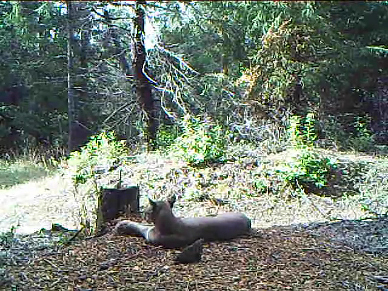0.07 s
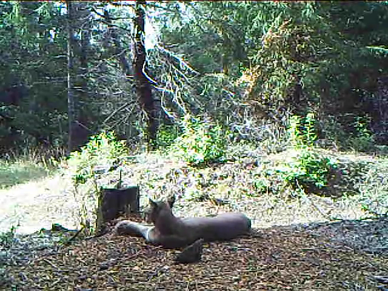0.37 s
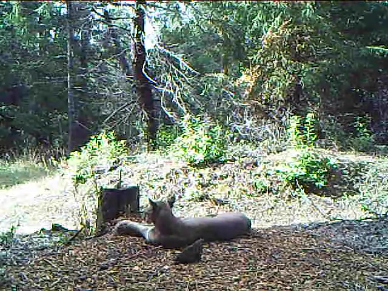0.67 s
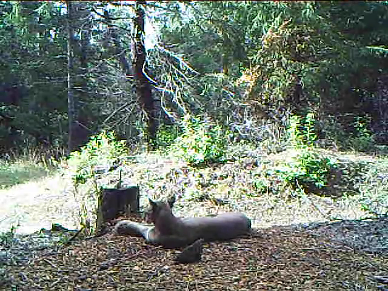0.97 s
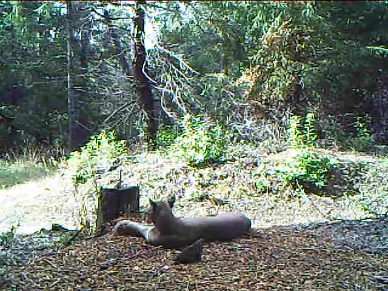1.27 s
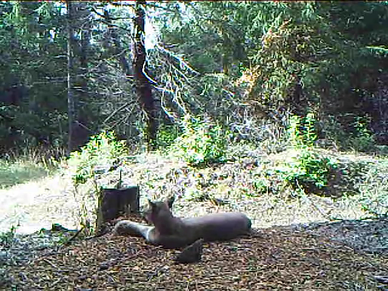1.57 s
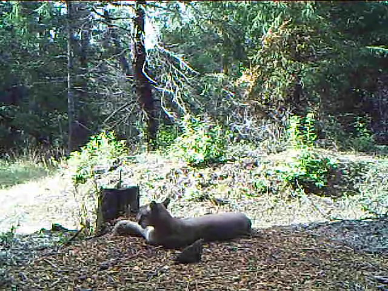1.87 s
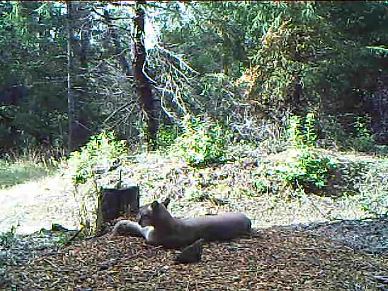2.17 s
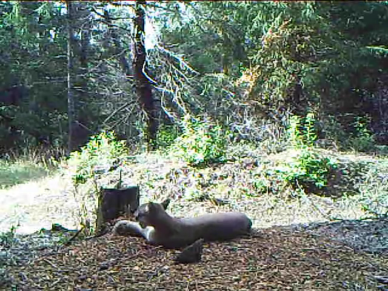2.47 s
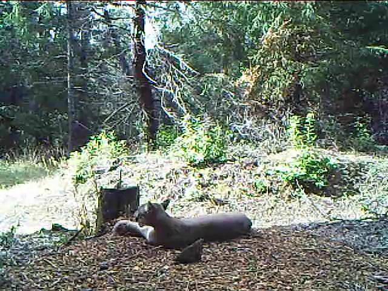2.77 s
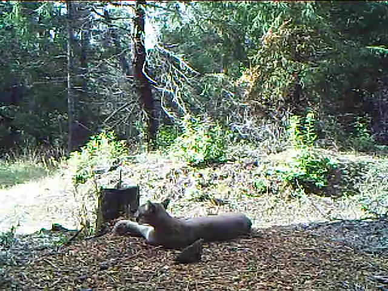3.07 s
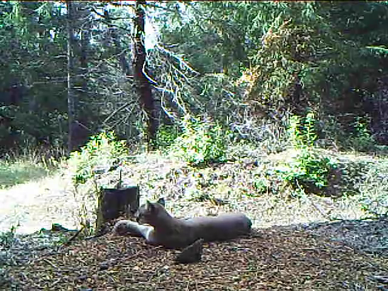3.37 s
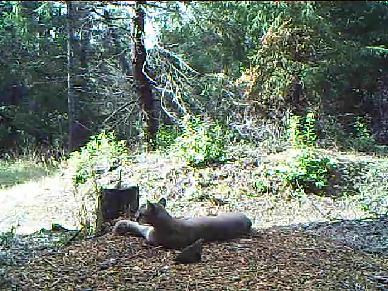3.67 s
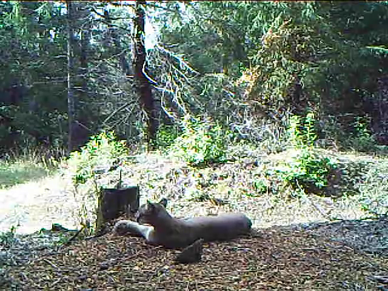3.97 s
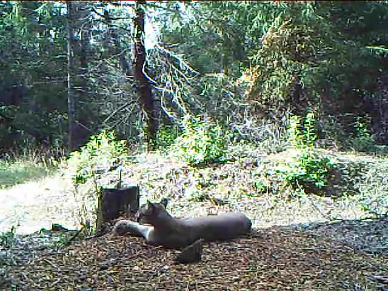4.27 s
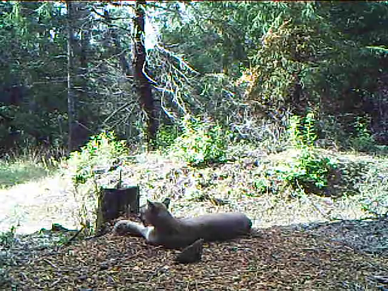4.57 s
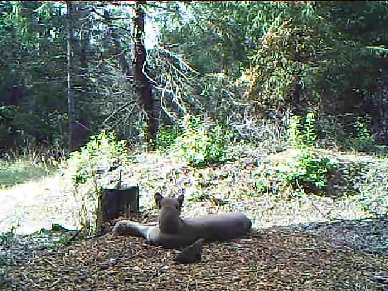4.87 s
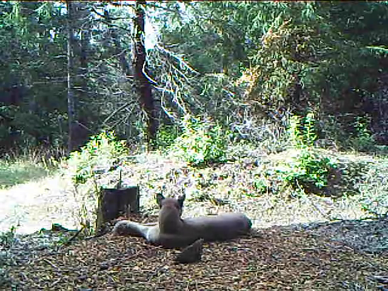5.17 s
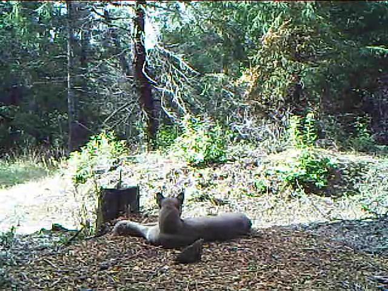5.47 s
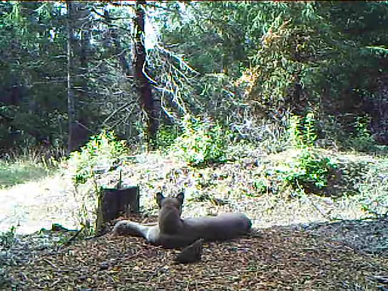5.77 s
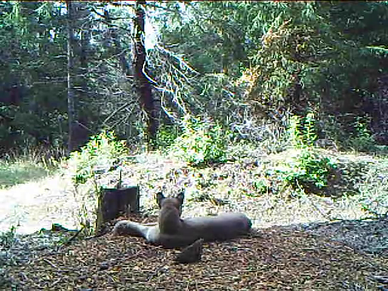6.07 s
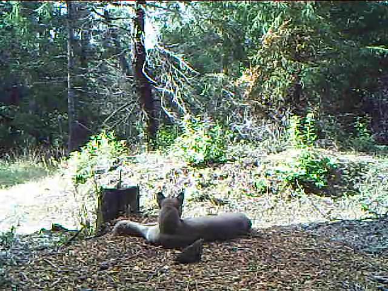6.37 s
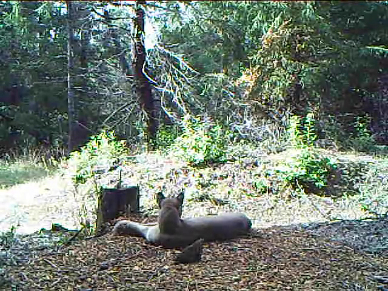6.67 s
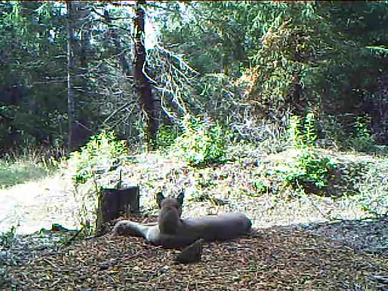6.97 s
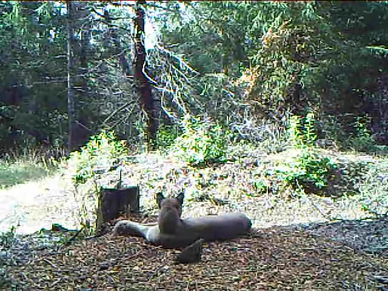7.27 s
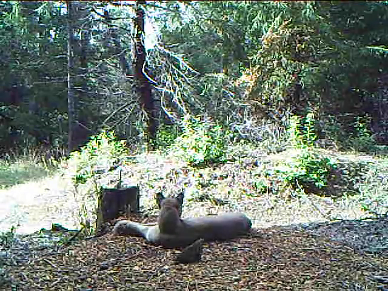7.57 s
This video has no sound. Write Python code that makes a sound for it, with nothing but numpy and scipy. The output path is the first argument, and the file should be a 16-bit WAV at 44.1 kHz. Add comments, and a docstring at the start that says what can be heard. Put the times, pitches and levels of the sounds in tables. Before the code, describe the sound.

A puma gives three loud, whistling, raspy cries that echo through a forest, over a faint, distant helicopter throb and soft hiss.

```python
"""A distant helicopter throbs; a few sharper cracks of its blades stand out as soft, dry clicks.
Then a puma in a forest clearing gives three whistling, rasping cries, and the trees throw them back.
Its tight vocal folds make the whistle; air swirling through its throat makes the rasp.
The helicopter's blades push the air as they pass, over a roar of churned air.
A small camera adds its hiss, a thin whine and a few electrical ticks."""
import sys
import numpy as np
from scipy import signal
from scipy.fft import rfft, irfft, next_fast_len
from scipy.io import wavfile
from scipy.ndimage import map_coordinates

SR = 44100
rng = np.random.default_rng(int(sys.argv[2]) if len(sys.argv) > 2 else 0)


def put_to_file(sound):
    """Save the sound as 16-bit audio at rate SR, in the file named by the first command-line argument."""
    columns = np.atleast_2d(sound).T  # one column per channel
    safe = np.clip(columns, -1, 1)
    whole_steps = np.round(safe * 32767)
    wavfile.write(sys.argv[1], SR, whole_steps.astype(np.int16))


N = 340011
TIME = np.arange(N) / SR

# The three cries, and a lower tone under the long one's end: time_s, pitch_hz, whistle_db, rasp_db
FIRST_CRY = [(1.862, 1866, -68, -75), (1.878, 1808, -48.5, -72), (1.899, 1809, -52, -74),
             (1.906, 2170, -49, -72), (1.925, 2015, -52, -64.5), (1.957, 2020, -45.5, -61),
             (2.007, 1935, -49.5, -63), (2.02, 1777, -34, -57), (2.075, 1557, -37.5, -56),
             (2.098, 1140, -44.5, -58.5), (2.125, 943, -61.5, -59), (2.17, 744, -80, -84)]
LONG_CRY = [(2.604, 955, -57, -88), (2.631, 1590, -48.5, -67), (2.665, 1882, -37.5, -60),
            (2.712, 2096, -33, -59), (2.761, 1960, -34, -50), (2.767, 1870, -33, -43.5),
            (2.83, 1751, -29, -49), (2.856, 1622, -37.5, -44), (2.94, 1328, -38.5, -47),
            (2.98, 1275, -44.5, -56), (3.075, 1142, -51.5, -63), (3.149, 1052, -81, -72)]
LAST_CRY = [(4.915, 1790, -57, -64), (4.921, 1787, -40.5, -59), (4.945, 1837, -39, -66),
            (4.951, 2167, -47, -60), (4.967, 2180, -44, -62), (4.982, 2038, -38, -65),
            (5.045, 2147, -34.5, -60), (5.075, 1917, -39.5, -60), (5.087, 1882, -33.5, -56),
            (5.112, 1592, -40.5, -60), (5.127, 1063, -47.5, -54.5), (5.165, 830, -73, -72)]
UNDERTONE = [(2.947, 1030, -54, -81), (2.954, 1015, -40.5, -80), (2.977, 1028, -40.5, -76),
             (2.992, 856, -56.5, -85), (3.065, 767, -53, -86), (3.11, 735, -78, -86)]
# The voice's tone colours (which frequencies are strong or weak): frequency_hz, gain_db
THROAT_COLOUR = [(300, -35), (900, -35), (1200, -6.5), (1500, -16), (1950, -7), (2330, -9.5), (2650, 3.5),
                 (3800, -3), (4300, -6), (4550, -25.5), (5050, -21.5), (5500, -45), (15500, -35)]  # the open throat
OCTAVE_COLOUR = [(2000, -19), (2400, -17), (2700, 7), (3200, 5), (3600, 1), (4200, 1), (4500, -19)]  # how the throat passes the whistle's octave
BREATH_COLOUR = [(3000, -17), (5000, -9), (6200, -1), (7300, 1.5), (8800, -5.5), (9700, 1), (10200, 2.5),
                 (10900, -2), (11500, -1), (12500, -2)]  # hiss past the teeth
# Narrow bands where the throat rings: centre_hz, width_hz, gain_db
THROAT_RINGS = [(2860, 76, 0.5), (3540, 100, -1), (4240, 140, 0)]
# The voice breaks into the scream: start_s, level_db
VOICE_CRACKS = [(2.765, -26), (2.7726, -24)]
# Brief, wavering tones in and just after the cries: start_s, length_s, pitch_hz, level_db
BRIEF_TONES = [(1.923, 0.052, 2370, -59), (1.943, 0.053, 3680, -56.5), (2.078, .017, 4220, -55),
               (2.101, 0.044, 1715, -49.5), (2.126, 0.015, 4130, -58.5), (2.814, 0.085, 3563, -42),
               (2.925, 0.033, 2780, -47), (2.954, 0.071, 4160, -53), (3.003, 0.047, 2780, -55.5),
               (3.071, 0.068, 2780, -57), (4.963, 0.027, 3120, -55), (5.048, 0.037, 3090, -51.5)]
# How long the forest's echo takes to fade by 60 dB: frequency_hz, fade_s
ECHO_FADE = [(500, 0.49), (1200, 0.87), (2000, 0.82), (3300, 0.88), (4500, 0.51), (12000, .3)]
# The echo's tone colour: frequency_hz, gain_db
ECHO_COLOUR = [(500, 12), (1200, -5), (1750, -1.5), (2100, 5), (2450, -7.5), (3300, 4), (4200, -3),
               (9000, -9)]
# How often a helicopter blade passes: time_s, passes_per_s
BLADE_RATE = [(0, 15.1), (2, 13.4), (3.5, 13.45), (4.5, 13.9), (5.3, 13.9), (6.3, 14.02), (7.71, 13.8)]
# The rotor's loudness as it draws near and moves off: time_s, level_db
THUMP_LEVEL = [(0, -58.5), (1.4, -58.5), (2.8, -54), (3.8, -54), (5.1, -52), (6.2, -55.5), (7.71, -56)]
# Tone colours of the helicopter's three pulses and three noises: frequency_hz, gain_db
THUMP_COLOUR = [(14, 4.5), (28, -12.5), (42, -0.5), (56, 2), (70, -7), (84, -19)]
SLAP_COLOUR = [(56, -33), (84, -15), (97, 4), (125, -0.5), (160, 0), (200, -0.5), (260, -34)]
THROB_COLOUR = [(14, 5), (28, 2.5), (42, -9)]
RUMBLE_COLOUR = [(5, -21.5), (25, 2.5), (60, 2.5), (100, -1), (200, -17.5), (400, -36.5)]
ROAR_COLOUR = [(40, -10), (130, -1.5), (230, -1.5), (380, -8.5), (520, -13), (900, -36.5)]
SWISH_COLOUR = [(200, -33), (350, 0), (440, 1), (485, 2), (535, 3.5), (620, -3), (790, -0.5), (930, -17.5),
                (1100, -10), (1800, -15.5), (2500, -24), (6000, -38)]
# Helicopter sounds that swell and fade: peak_s, half_width_s, level_db
SLAP_SWELLS = [(2.1, 0.27, -67.5), (5.7, 0.99, -59)]
THROB_SWELL = [(5.8, 0.68, -56.5)]
WAKE_CUTS = [(.85, 0.47, -54), (6.3, 0.49, -51.5)]  # blades cut their own wake (stirred air), cracking and swishing
ROAR_SWELL = [(1.25, 0.72, -61)]
# Sharper cracks of the blades that stand out as soft, dry clicks: start_s, peak_db
BLADE_CLICKS = [(0.6693, -58), (.7435, -55.5), (0.822, -59), (0.856, -54.5), (.8955, -51)]
# The tone colour of the camera's hiss: frequency_hz, gain_db
HISS_COLOUR = [(30, -29), (900, 12), (2000, 6), (4000, 3), (6000, 0), (10000, -2.5), (15500, -7.5)]
# Electrical ticks, each jumping up (+1) or down (-1): start_s, level_db, direction
TICKS = [(2.745, -35, 1), (3.012, -46, -1), (3.279, -41, 1), (4.5792, -42, -1), (6.1118, -41.5, 1)]


def cry(rows, octave_db=-50, octave_growth=0.69, bloom_db=0, bloom_s=0.075,
        closing_s=.1, closing_db_per_s=450, between_db=0, third_db=-28, fourth_db=-35,
        jitter=0.0051, rough_jitter=0.036, shimmer=0.28, rough_shimmer=0.26,
        buzz_depth=.9, buzz_hz=430, fray_db=-5, fray_per_s=750,
        flutter=0.17, flutter_per_s=450, rasp_db=-1, breath_db=-40.5, rasp_breath=3.3):
    """Tight vocal folds whistle; strained, they flutter and the air rasps. Gives (start_s, sound)."""
    t = np.arange(rows[0][0], rows[-1][0], 1 / SR)
    hz, whistle, rasp = curves(rows, t)
    roughness = amp(rasp) / (amp(rasp) + amp(whistle))
    # the octave (twice the pitch) follows the whistle, can start softly, and gives out at the end
    octave = octave_db + octave_growth * (whistle - whistle.max()) + at_hz(OCTAVE_COLOUR, 2 * hz)
    octave += bloom_db * np.exp(-(t - t[0]) / bloom_s)
    octave -= closing_db_per_s * np.maximum(t - t[-1] + closing_s, 0)
    # jitter shakes the pitch; shimmer shakes the loudness
    pitch_shake = (jitter + rough_jitter * roughness) * wander(t, 560)
    phase = 2 * np.pi * np.cumsum(hz * (1 + pitch_shake)) / SR
    upper = np.minimum(octave, -50)  # the faint top overtones stop growing with effort
    tone = 0
    for k, db in enumerate([whistle, octave, upper + third_db, upper + fourth_db], 1):
        level_shake = (shimmer + rough_shimmer * roughness) * wander(t, 260.6)
        tone += amp(db) * np.cos(k * phase) * (1 + level_shake)
    # a slower, unsteady vibration adds tones on either side of the whistle
    buzz = np.cos(2 * np.pi * np.cumsum(buzz_hz * (1 + 0.223 * wander(t, 200))) / SR)
    tone *= 1 + buzz_depth * roughness * buzz
    # every other cycle differs now and then, adding a tone between whistle and octave
    tone += amp(np.minimum(rasp, octave) + between_db) * wander(t, 99) * np.cos(1.5 * phase)
    # swirling air shakes the folds too, fraying the whistle into noise
    fray = wander(t, fray_per_s) * np.cos(phase) + wander(t, fray_per_s) * np.sin(phase)
    tone += amp(rasp + fray_db) * fray
    puffs = rng.standard_normal(N)[:len(t)] * np.exp(flutter * wander(t, flutter_per_s))
    effort = amp(whistle) + amp(octave) + rasp_breath * amp(rasp)
    breath = amp(breath_db) * effort * coloured(puffs, BREATH_COLOUR)
    breath = signal.lfilter(*signal.butter(2, 13000, fs=SR), breath)  # distance dulls the hiss
    voice = tone + breath + amp(rasp + rasp_db) * throat(puffs)
    return t[0], voice * signal.windows.tukey(len(t), .02)


def throat(x):
    """The throat shapes the rasp with a broad tone colour and a few narrow bands."""
    hz = np.fft.rfftfreq(len(x), 1 / SR)
    rings_db = sum(db / (1 + (2 * (hz - centre) / width) ** 2) for centre, width, db in THROAT_RINGS)
    return coloured(irfft(rfft(x) * amp(rings_db), len(x)), THROAT_COLOUR)


def voice_crack(db, low_hz=1900, high_hz=2750, high_share=0.51, rise_s=0.0014):
    """One hard snap of the vocal folds rings the throat for a few cycles."""
    t = TIME[:SR // 100]
    ring = np.sin(2 * np.pi * low_hz * t) + high_share * np.sin(2 * np.pi * high_hz * t)
    return amp(db) * ring / (1 + high_share) * t / rise_s * np.exp(1 - t / rise_s)


def brief_tone(length_s, hz, db, jitter=0.014, shimmer=0.26):
    """A short, wavering tone, from the voice or its echo."""
    t = TIME[:round(length_s * SR)]
    tone = np.sin(2 * np.pi * np.cumsum(hz * (1 + jitter * wander(t, 474))) / SR)
    return amp(db) * tone * (1 + shimmer * wander(t, 234)) * signal.windows.tukey(len(t), .5)


def forest_echo(x, tail_db=-15, build_s=0.0079, trunk_db=-24, trunk_count=6):
    """Near trunks answer first; scattered sound builds up and dies away, the highest notes soonest."""
    hz, t, bands = signal.stft(rng.standard_normal(SR), SR, nperseg=256)
    fading = amp(at_hz(ECHO_COLOUR, hz)[:, None] - 60 * t / at_hz(ECHO_FADE, hz)[:, None])
    building = 1 - np.exp(-t / build_s)
    tail = signal.istft(bands * fading * building, SR, nperseg=256)[1]
    voice_band = abs(rfft(tail, SR))[1000:4000]  # 1000 to 4000 Hz
    tail /= np.sqrt(np.mean(voice_band ** 2))
    delays_s = rng.uniform(.008, .05, trunk_count)
    trunks = sum(np.pad(x, (round(s * SR), 0))[:N] for s in delays_s)
    return amp(trunk_db) * trunks + amp(tail_db) * signal.fftconvolve(x, tail)[:N]


def helicopter(pass_s=5.317, slap_db=-1, rumble_db=-8, roar_db=-66.5, echo_s=0.01844, echo_share=0.54,
               swish_db=-73, swish_db_per_s=0.79, wake_swish_db=-16, chop=0.16):
    """Blades pulse over the roar of churned air; the swish surges each time a blade passes."""
    passes = np.cumsum(curves(BLADE_RATE, TIME)[0]) / SR
    passes -= np.interp(pass_s, TIME, passes)  # one blade passes exactly at pass_s
    thump_db = curves(THUMP_LEVEL, TIME)[0]
    slaps = blade_pulses(passes, SLAP_COLOUR, tone_count=18)
    slaps = unit(slaps + echo_share * np.roll(slaps, round(echo_s * SR)))  # echo off the ground
    pulses = amp(thump_db) * blade_pulses(passes, THUMP_COLOUR, tone_count=6)
    pulses += amp(slap_db) * swells(SLAP_SWELLS) * slaps + blade_cracks(passes)
    pulses += swells(THROB_SWELL) * blade_pulses(passes, THROB_COLOUR, tone_count=3)
    rumble = amp(thump_db + rumble_db) * noise(RUMBLE_COLOUR)
    roar = np.hypot(amp(roar_db), swells(ROAR_SWELL)) * noise(ROAR_COLOUR)
    swish_gain = np.hypot(amp(swish_db + swish_db_per_s * TIME), amp(wake_swish_db) * swells(WAKE_CUTS))
    surge = unit(np.exp(chop * np.cos(2 * np.pi * passes)))
    return pulses + rumble + roar + swish_gain * surge * noise(SWISH_COLOUR)


def blade_pulses(passes, colour, tone_count):
    """Each blade pushes and pulls the air; moving air shifts each tone's strength and timing a little."""
    t, passes = TIME[::16], passes[::16]  # low tones need fewer samples
    rate_hz = np.mean(curves(BLADE_RATE, t))
    pulses = 0
    for k in range(1, tone_count + 1):
        fading_db, drift = 1.2 * wander(t, 1), .35 * wander(t, .8)
        pulses -= amp(at_hz(colour, k * rate_hz) + fading_db) * np.sin(2 * np.pi * k * passes + drift)
    return unit(np.interp(TIME, t, pulses))


def blade_cracks(passes, width_s=0.0009, spread_db=3):
    """A blade that cuts the wake of the one before gives a short, sharp spike."""
    hits = np.diff(np.floor(passes), prepend=np.floor(passes[0]))
    strength = swells(WAKE_CUTS) * amp(spread_db * wander(TIME, 23))
    age = TIME[:SR // 100] / width_s
    spike = 2 * (1 - age) * np.exp(-age) * np.minimum(3 * age, 1)
    return signal.oaconvolve(hits * strength, spike)[:N]


def blade_click(db, band_hz=(350, 1700), decay_s=0.0018):
    """A sharper blade crack, heard as a dry click that dies within milliseconds."""
    t = TIME[:SR // 80]
    burst = rng.standard_normal(len(t)) * np.exp(-t / decay_s)
    puff = signal.lfilter(*signal.butter(2, band_hz, "bandpass", fs=SR), burst)
    return amp(db) * puff / abs(puff).max()


def electronics(hiss_db=-73, whine_hz=13629, whine_db=-90, tick_s=.00018):
    """The camera's amplifier hisses, with a thin whine and brief electrical ticks."""
    out = amp(hiss_db) * noise(HISS_COLOUR) + amp(whine_db) * np.sin(2 * np.pi * whine_hz * TIME)
    for start_s, db, direction in TICKS:
        add(out, start_s, direction * amp(db) * np.ones(round(tick_s * SR)))
    return out


def amp(db):
    """Turns decibels into a number to multiply by."""
    return 10 ** (np.asarray(db) / 20)


def unit(x):
    """Scales a sound to an average strength (rms) of 1."""
    return x / np.sqrt(np.mean(x ** 2) + 1e-20)


def at_hz(points, hz):
    """Reads a table at the frequencies hz, with octaves evenly spaced."""
    table_hz, value = np.transpose(points)
    return np.interp(np.log(hz + 1), np.log(table_hz + 1), value)


def curves(rows, t):
    """Reads a table's columns at the times t."""
    time_s, *columns = np.transpose(rows)
    return [np.interp(t, np.sort(time_s), column) for column in columns]


def coloured(x, colour):
    """Gives x a tone colour, at strength 1."""
    gain = amp(at_hz(colour, np.fft.rfftfreq(len(x), 1 / SR)))
    return unit(irfft(rfft(x) * gain, len(x)))


def noise(colour):
    """Steady noise with a tone colour."""
    return coloured(rng.standard_normal(next_fast_len(N, True)), colour)[:N]


def wander(t, rate):
    """A smooth random wobble of size about 1, with rate new values a second."""
    targets = rng.standard_normal(8192)
    return map_coordinates(targets, [(t - t[0]) * rate], order=2, mode="wrap")


def swells(rows):
    """Loudness that rises to each row's peak and falls away again."""
    return sum(amp(db) / (1 + ((TIME - peak_s) / width_s) ** 2) for peak_s, width_s, db in rows)


def add(mix, start_s, sound):
    """Mixes a sound in at start_s."""
    part = mix[round(start_s * SR):][:len(sound)]
    part += sound[:len(part)]


def scene():
    """The puma and its echo over the background."""
    puma, blade_clicks = np.zeros((2, N))
    add(puma, *cry(FIRST_CRY, octave_db=-45.5, octave_growth=0.26, bloom_db=-27, closing_s=0.094,
                   between_db=-14, rasp_db=-2, third_db=-28, buzz_depth=0.43))
    add(puma, *cry(LONG_CRY, octave_db=-43.5, closing_s=0.32,
                   between_db=-8, rasp_db=1.0, third_db=-33, buzz_depth=0.66))
    add(puma, *cry(UNDERTONE, jitter=0.0092, shimmer=0.19))
    add(puma, *cry(LAST_CRY, octave_db=-45.0, closing_s=0.065, shimmer=0.33,
                   between_db=-15, rasp_db=0.5, third_db=-27, buzz_depth=0.28))
    for start_s, db in VOICE_CRACKS:
        add(puma, start_s, voice_crack(db))
    for start_s, length_s, hz, db in BRIEF_TONES:
        add(puma, start_s, brief_tone(length_s, hz, db))
    for start_s, db in BLADE_CLICKS:
        add(blade_clicks, start_s, blade_click(db))
    return (puma + forest_echo(puma) + blade_clicks + helicopter() + electronics())[None]


def record(dry):
    """The camera cuts off the very highest frequencies."""
    cutoff_hz = 15750
    low_pass = signal.firwin(511, cutoff_hz, window=("kaiser", 9), fs=SR)
    return signal.oaconvolve(dry, low_pass[None], "same")


dry = scene()
out = record(dry)
put_to_file(out)
```